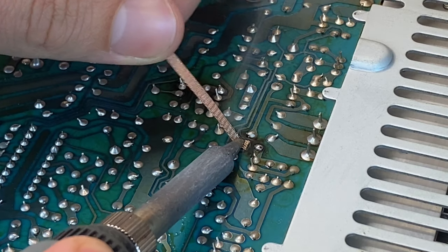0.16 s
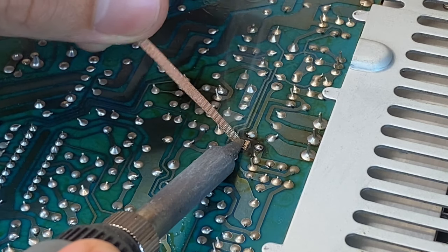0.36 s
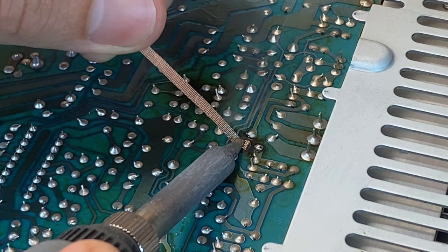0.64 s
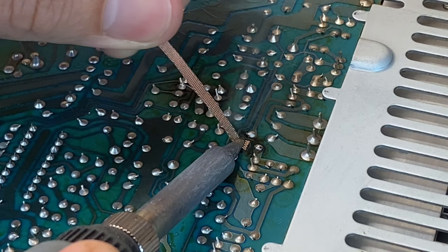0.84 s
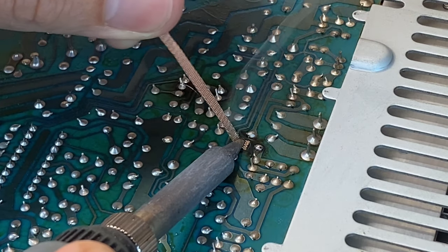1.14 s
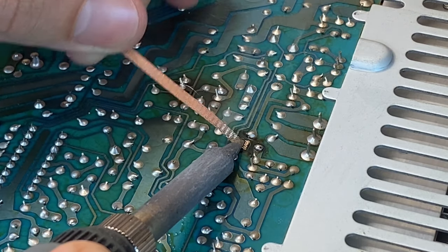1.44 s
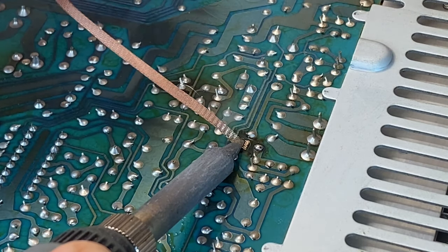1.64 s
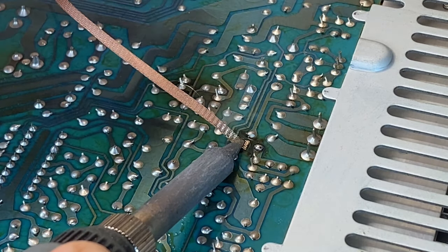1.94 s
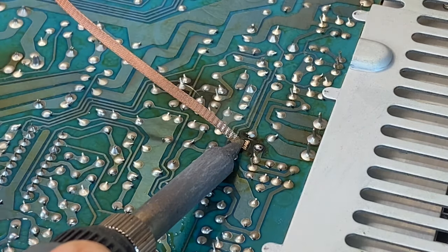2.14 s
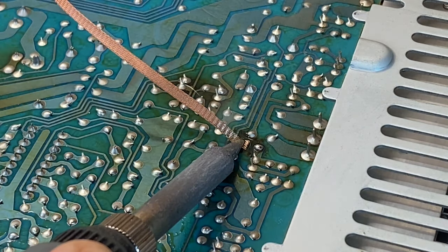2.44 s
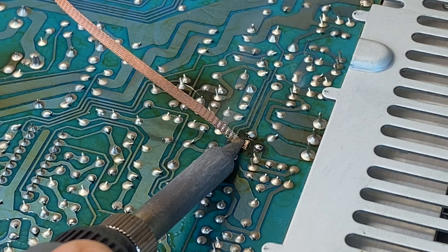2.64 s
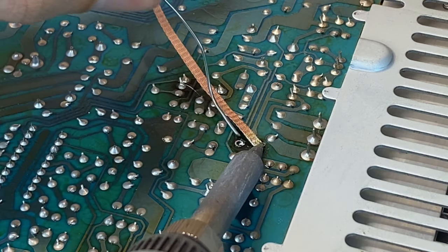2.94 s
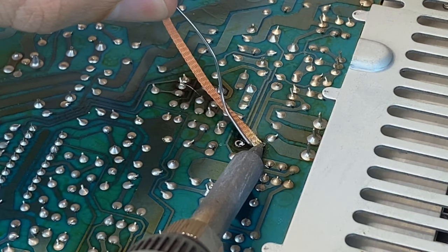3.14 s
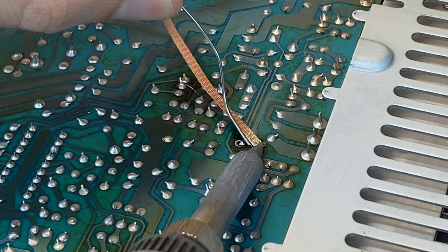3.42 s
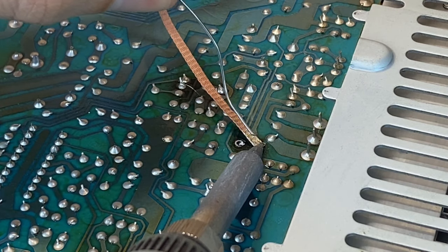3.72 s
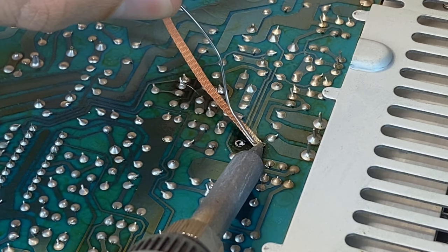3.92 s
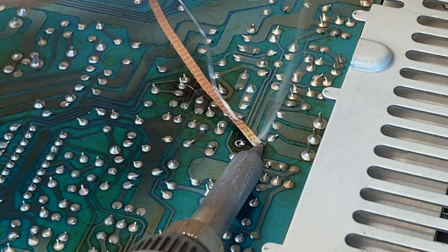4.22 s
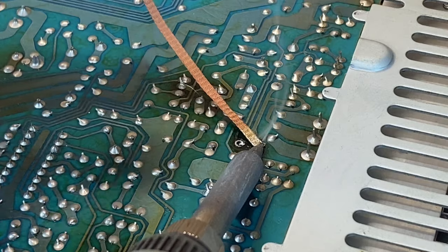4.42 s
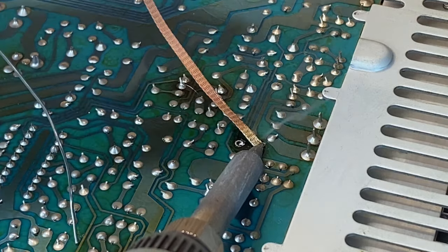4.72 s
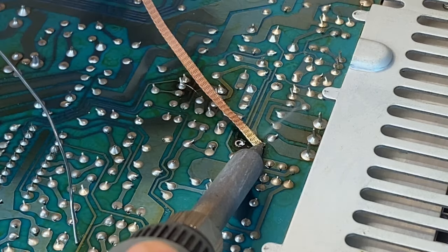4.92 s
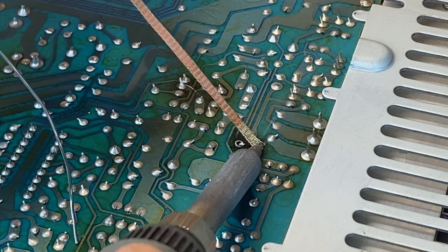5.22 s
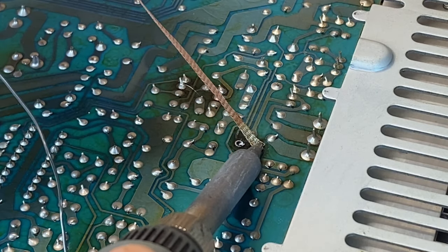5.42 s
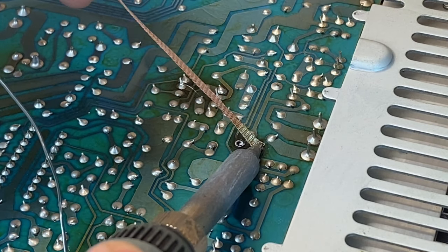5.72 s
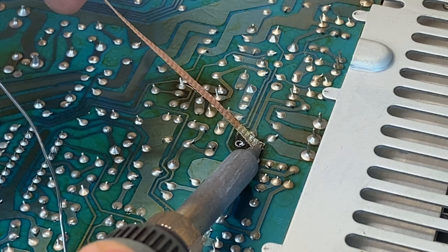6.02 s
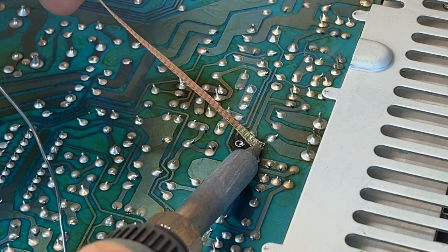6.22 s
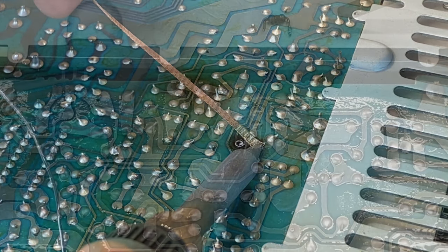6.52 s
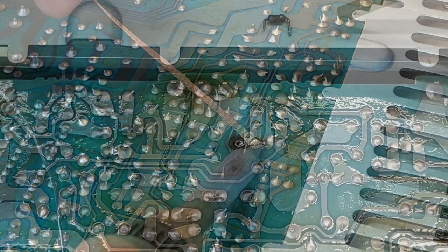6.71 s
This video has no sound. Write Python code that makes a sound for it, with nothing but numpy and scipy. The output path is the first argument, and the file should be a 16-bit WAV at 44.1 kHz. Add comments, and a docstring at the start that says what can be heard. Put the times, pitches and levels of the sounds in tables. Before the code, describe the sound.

A small electric fan whirs steadily beside a soldering bench, with tiny flux spits and two soft bumps, then cuts abruptly to a quiet room.

```python
"""A small five-bladed fan runs steadily beside a soldering bench, heard by two microphones. Shaft harmonics
give its blade tones, coloured noise its airy, faintly whistling hiss, steady lines its motor hum. A moving arm
shifts the colour of the hiss; hot flux spits in short bright puffs of noise, and the wick scrapes once softly.
Decaying low modes make two soft bumps on the bench; a very short noise burst makes one tiny dry click. Near the
end it all cuts off to the dull, faint noise of a quiet room."""
import sys
import numpy as np
from scipy import signal
from scipy.fft import rfft, irfft
from scipy.io import wavfile
from scipy.ndimage import uniform_filter1d

SR = 44100
rng = np.random.default_rng(int(sys.argv[2]) if len(sys.argv) > 2 else 0)


def wav_out(sig):
    """Save sig, one row per channel (or a flat mono array), as 16-bit PCM at SR to the path in sys.argv[1]."""
    wavfile.write(sys.argv[1], SR, np.round(np.clip(np.atleast_2d(sig).T, -1, 1) * 32767).astype(np.int16))


N = 302673  # samples

SHAFT_HZ, BLADES = 51.28, 5
STOP_S = 6.752  # the bench gives way to the quiet room

# How the fan reaches the two microphones:
# [f/Hz, left-right/dB, likeness 0-1, phase by which left leads/rad]
MIC_PATHS = [(75, -0.2, 0.98, 0.13), (125, 1.0, 0.95, 0.47), (190, 6.0, 0.672, 0.89),
             (255, 3.8, 0.887, 0.23), (310, 2.6, 0.97, 0.38), (365, 3.1, 0.748, 0.48),
             (430, 8.2, 0.701, 0.33), (590, 5.7, 0.769, 0.57), (720, 1.4, 0.84, 0.08),
             (880, -1.9, 0.7, -0.35), (1050, 5.0, 0.68, -0.5), (1230, 3.5, 0.6, 0.05),
             (1450, 0.8, 0.77, 0.55), (1750, 2.6, 0.76, 0.11), (1950, 1, 0.92, 0.05), (2150, 0.2, 0.99, 0),
             (2400, 0, 0.999, 0), (2750, 0, 0.985, 0.1), (3000, -0.3, 0.96, 0.33), (3400, 0, 0.98, 0.25),
             (3520, 0, 1, 0)]


def gain_of(db):
    """Decibels to an amplitude factor."""
    return 10 ** (np.asarray(db) / 20)


def evened(x):
    """Scales to an rms of 1."""
    return x / np.sqrt(np.mean(x ** 2) + 1e-20)


def read(points, hz, axis=1):
    """One column of a table, joined by straight lines over log frequency."""
    table = np.array(points, float)
    return np.interp(np.log(hz + 1), np.log(table[:, 0] + 1), table[:, axis])


def bell_lifts(bells, hz):
    """Sum of bell-shaped lifts in dB, from rows of f/Hz, width/Hz, lift/dB."""
    return sum(db * np.exp(-2 * ((hz - f) / width) ** 2) for f, width, db in bells)


def add(mix, s, sound):
    """Mixes a sound in at time s, cut at the end of the mix."""
    part = mix[round(s * SR):][:len(sound)]
    part += sound[:len(part)]


def seconds():
    """Time of every sample."""
    return np.arange(N) / SR


def bins():
    """Frequencies of a full-length spectrum."""
    return np.fft.rfftfreq(N, 1 / SR)


def white():
    """Spectrum of fresh white noise."""
    return rfft(rng.standard_normal(N))


def drift(rate_hz):
    """Random wander of rms 1, rolled off above the given rate."""
    return evened(irfft(white() / (1 + (bins() / rate_hz) ** 4), N))


def treble_lag(hz, above_hz=7520, level_hz=7250, lag_s=.000256):
    """Above above_hz the left channel's top treble turns in phase against the right, more so with rising
    frequency; phase is zero at level_hz."""
    return np.exp(-2j * np.pi * (hz > above_hz) * (hz - level_hz) * lag_s)


def tone(turns, hz, db, balance_db, flutter):
    """One line at both microphones; turbulence shakes its strength and phase."""
    shake = 1 + flutter * (drift(30) + 1j * drift(19))
    side = np.array([[.5], [-.5]])  # left, right
    phase = 2 * np.pi * (turns + rng.random()) + side * read(MIC_PATHS, hz, axis=3)
    line = shake * np.exp(1j * phase)
    return np.sqrt(2) * gain_of(db + side * balance_db) * line.real


def blade_swell(lift_db=-0.16):
    """Level change of the blade-passing tone in dB: a small trim and one smooth dip."""
    # The dip: [middle t/s, half-width/s, depth/dB]
    tone_dip = (5.1, 0.37, -1.7)
    middle_s, width_s, depth_db = tone_dip
    return lift_db + depth_db * np.exp(-((seconds() - middle_s) / width_s) ** 2)


def blades(turns, pass_flutter=0.15, octave_flutter=0.0091, weak_flutter=0.32):
    """Shaft harmonics; the blade-passing tone dips once, its octave is the steadiest."""
    # Fan tones, strongest at the blade-passing tone and its octave:
    # [multiple of shaft speed, level/dB before swell and flutter, left-right/dB]
    fan_tones = [(4, -53.3, 8.4), (5, -41.2, -3.0), (7, -57.3, -2.8), (10, -38.8, 6.4), (15, -54.1, 4.5),
                 (20, -61.0, 6.0), (25, -57.5, 3.6), (30, -57.9, 1.9), (35, -58.0, 2.6), (50, -59.5, -0.1),
                 (55, -63.0, 0.1)]
    flutters = {BLADES: pass_flutter, 2 * BLADES: octave_flutter}
    out = np.zeros((2, N))
    for k, db, balance_db in fan_tones:
        swell_db = blade_swell() if k == BLADES else 0
        out += tone(k * turns, k * SHAFT_HZ, db + swell_db, balance_db, flutters.get(k, weak_flutter))
    return out


def reflections(rush, wander_db=1.05, size=1024):
    """An arm near the work ripples the colour of the rush; small movements keep it wandering."""
    # The solderer's arm: [t/s, nearness: 1 close, 0 usual, below 0 drawn back]
    arm = [(2.05, 1), (2.25, -0.15), (4.4, 0.022), (4.8, -0.03)]
    # What the arm's reflection does at nearness 1: [f/Hz, width/Hz, lift/dB]
    arm_ripple = [(1300, 110, -3), (1820, 170, 3.5), (2240, 89, 3.5), (2510, 61, 3), (2580, 90, -0.5),
                  (2900, 290, -2), (3240, 140, 2.8), (3660, 60, 1), (3850, 120, 1)]
    hz, t, z = signal.stft(rush, SR, nperseg=size)
    nearness = np.interp(t, *np.transpose(arm))
    patches = rng.standard_normal((len(t), len(hz)))
    patches = uniform_filter1d(patches, size=40, axis=0)  # slow in time
    patches = uniform_filter1d(patches, size=2, axis=1)  # fine in frequency
    wander = wander_db * evened(patches).T * (hz > 1000)[:, None]
    lift_db = bell_lifts(arm_ripple, hz)[:, None] * nearness + wander
    return signal.istft(z * gain_of(lift_db), SR, nperseg=size)[1][:, :N]


def eased_hiss(rush, hiss_hz=1300, start_db=0.12, sag_db_per_s=0.0872):
    """The rush above hiss_hz eases off steadily from a slight lift at the start."""
    hiss = irfft(rfft(rush) * (bins() > hiss_hz), N)
    return rush - hiss + hiss * gain_of(start_db - sag_db_per_s * seconds())


def air(turns, level_db=-34.5, swell_db=0.27, flicker_db=0.37, chop=0.017):
    """Turbulence coloured by the housing, faintly chopped by the passing blades."""
    # Rush of air through the fan: [f/Hz, relative level per Hz/dB]
    air_colour = [(20.0, -50), (35.0, -19), (55.0, -3), (90.0, 0), (190.0, -6), (410.0, -11), (640.0, -7),
                  (1130.0, -11), (2100.0, -10.5), (3600.0, -14), (4800.0, -16.5), (7000.0, -27),
                  (9000.0, -40.5), (15000.0, -51.5)]
    # Resonances of the housing and bench: [f/Hz, width/Hz, lift/dB]
    housing = [(135, 36, 1.5), (251.5, 42, 8), (311.3, 52.4, 10), (392, 26, 2), (473, 39, 4.5),
               (543, 106, 4.5), (701, 38, 5.5), (777, 79, 1.2), (822, 37, 2.5), (864, 38, 6), (1042, 53, 3),
               (1120, 33, -3), (1170, 46, 1.6), (1320, 70, 0.7), (1428, 55, 5.2), (1476, 69, 4.5),
               (1720, 310, 0.8), (2210, 80, 0.9), (2350, 150, 1.5), (2415, 77, 5), (2594, 83, 3.5),
               (2830, 130, 2), (2943, 100, 3), (3058, 140, 4.5), (3180, 75, 3), (3330, 117, 4.5),
               (3550, 60, 0), (3740, 60, 0.5), (3770, 80, -3.5), (3800, 90, 2.2), (3990, 90, 0.5),
               (5870, 260, 2), (6540, 200, 1.5), (7740, 860, 2.5), (10900, 3260, 6.5)]
    hz = bins()
    colour = gain_of(read(air_colour, hz) + bell_lifts(housing, hz))
    side_gain = gain_of(read(MIC_PATHS, hz) / 2)
    same = np.clip(read(MIC_PATHS, hz, axis=2), 0, 1)
    shared = white()
    left = shared * side_gain * np.exp(1j * read(MIC_PATHS, hz, axis=3)) * treble_lag(hz)
    right = (same * shared + np.sqrt(1 - same ** 2) * white()) / side_gain
    rush = evened(reflections(irfft(np.array([left, right]) * colour, N)))
    rush = eased_hiss(rush)
    blade_pass = np.cos(2 * np.pi * BLADES * turns)
    unsteady_db = swell_db * drift(2.9) + flicker_db * drift(42)
    return rush * gain_of(level_db + unsteady_db) * (1 + chop * blade_pass)


def whistle(waver_hz=14, swell_db=1.0):
    """Air sings faintly at the grille: a narrow band that wavers in pitch, and comes and goes."""
    # A breathy whistle on the main treble resonance: [middle f/Hz, width/Hz, level/dB]
    grille = (2412, 24, -58.5)
    hz, width_hz, db = grille
    turns = np.cumsum(hz + waver_hz * drift(3)) / SR
    breath = drift(width_hz) + 1j * drift(width_hz)
    band = breath * np.exp(2j * np.pi * turns)
    return gain_of(db) * evened(band.real * gain_of(swell_db * drift(2.5)))


def motor(trim_db=-0.94, flutter=0.34):
    """Electrical hum and whine: lines of steady pitch with a shaken level and phase."""
    # Mains hum and two motor whines: [f/Hz, level/dB before trim and flutter, left-right/dB]
    hum = [(119.9, -49.9, -0.1), (751.7, -51.8, -1.6), (872.5, -58.5, -6.5)]
    t = seconds()
    return sum(tone(hz * t, hz, db + trim_db, balance_db, flutter) for hz, db, balance_db in hum)


def flux(burst_s=0.0032, tail_s=.012, tail_db=-16):
    """Boiling flux and the solder wick: each spit, and the one soft scrape, is a double pop and a little fizz,
    with a brief scatter off the board."""
    # Spits, and at 2.252 s one slow-rising soft scrape of the wick: [t/s, level/dB of the first pop, rise/s]
    spits = [(.504, -57, .003), (.544, -58, .003), (2.252, -57, .008), (4.462, -35, .0005),
             (4.613, -44.5, 0.0011), (4.633, -56, .003), (4.664, -58, .001)]
    # Colour of a spit: [f/Hz, relative level per Hz/dB]
    spit_colour = [(2000, -25), (6000, 2), (8000, -5), (9200, 3), (10400, 6.5), (11600, -2), (12500, -1),
                   (13500, -3), (15300, -4), (16000, -7)]
    afterpop_s, afterpop_db = 0.0065, -10  # against the first pop
    fizz_s, fizz_db, fizz_count = 0.046, -65, 4  # tiny bubbles at random within fizz_s
    t, puffs, hz = np.arange(SR // 16) / SR, np.zeros(N), bins()
    for s, db, rise_s in spits:
        after = np.maximum(t - rise_s, 0)
        fall = np.exp(-after / burst_s) + gain_of(tail_db) * np.exp(-after / tail_s)
        envelope = np.minimum(t / rise_s, 1) * fall
        pops = [(0, db), (afterpop_s, db + afterpop_db)]
        fizz = [(fizz_s * chance, fizz_db) for chance in rng.random(fizz_count)]
        for delay_s, pop_db in pops + fizz:
            add(puffs, s + delay_s, gain_of(pop_db) * envelope * rng.standard_normal(len(t)))
    right = rfft(puffs) * evened(gain_of(read(spit_colour, hz)))
    return irfft(np.array([right * treble_lag(hz), right]), N)


def bump(rise_s=.004, low_cut_hz=36):
    """A soft push rings the low modes of the bench; the microphone drops the deepest part."""
    # Soft bumps: [t/s, level/dB]
    bumps = [(2.1211, -20.8), (2.7835, -27)]
    # What the bench rings with: [f/Hz, relative level/dB, t60/s]
    bench_modes = [(135, -9, .07), (100, 0, .05), (70, -9, .3), (48, -18, .3)]
    t, out = np.arange(SR // 2) / SR, np.zeros(N)
    ring = np.zeros(len(t))
    for hz, db, t60 in bench_modes:
        ring += gain_of(db) * np.exp(-np.log(1000) * t / t60) * np.sin(2 * np.pi * hz * t)
    for s, db in bumps:
        add(out, s, gain_of(db) * ring * (1 - np.exp(-t / rise_s)))
    low_cut = 1 - 1 / (1 + (bins() / low_cut_hz) ** 6)
    return irfft(rfft(out) * low_cut, N)


def click():
    """One tiny dry click, the same at both microphones: noise under a very short envelope."""
    # The click: [t/s, level/dB, length/s: twice the time to its peak]
    dry_click = (2.7518, -47, .0005)
    # Colour of the dry click: [f/Hz, relative level per Hz/dB]
    click_colour = [(2000, -6), (5500, 2), (8500, -1), (12000, 0), (15500, -1), (18000, -12)]
    s, db, length_s = dry_click
    t, out = np.arange(SR // 100) / SR, np.zeros(N)
    envelope = t / length_s * np.exp(2 - 2 * t / length_s)
    add(out, s, gain_of(db) * envelope * rng.standard_normal(len(t)))
    return irfft(rfft(out) * evened(gain_of(read(click_colour, bins()))), N)


def room(level_db=-58.4):
    """Dull, faint background noise, the same at both microphones."""
    # The quiet room: [f/Hz, relative level per Hz/dB]
    room_colour = [(10, -4), (30, 0), (70, -5), (120, -14), (200, -20), (420, -18), (1300, -28),
                   (2700, -43), (15000, -51)]
    return gain_of(level_db) * evened(irfft(white() * gain_of(read(room_colour, bins())), N))


def scene():
    """The fan's speed wanders very slightly; the bench sounds give way abruptly to a quiet room."""
    speed_hz = SHAFT_HZ * (1 + .0006 * drift(.6) + .0003 * drift(8))
    turns = np.cumsum(speed_hz) / SR
    fan = blades(turns) + air(turns) + whistle() + motor()
    bench = fan + flux() + bump() + click()
    return np.where(seconds() < STOP_S, bench, room())


def record(dry, edge_hz=15800):
    """Steep low-pass that limits the band of both channels."""
    low_pass = signal.firwin(511, edge_hz, window=("kaiser", 9), fs=SR)
    return signal.oaconvolve(dry, low_pass[None], "same")


dry = scene()
out = record(dry)
wav_out(out)
```